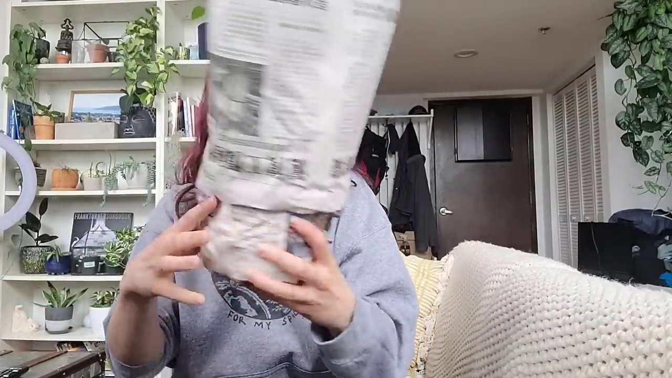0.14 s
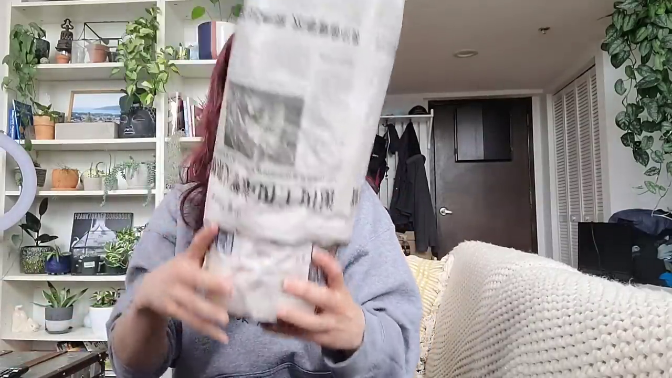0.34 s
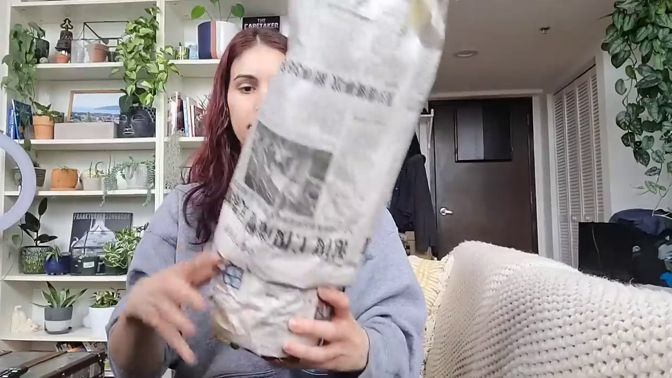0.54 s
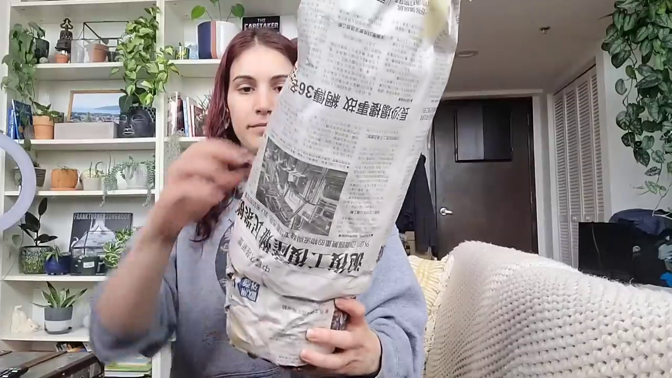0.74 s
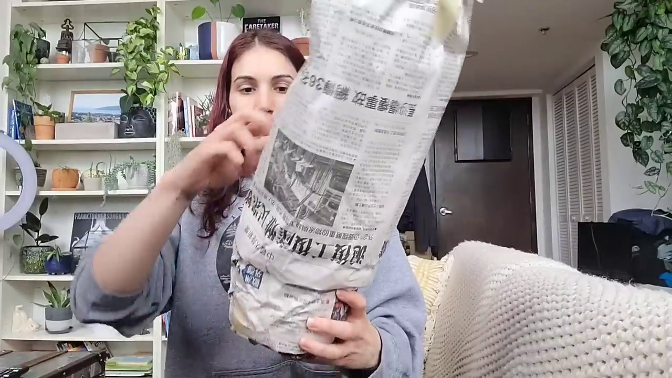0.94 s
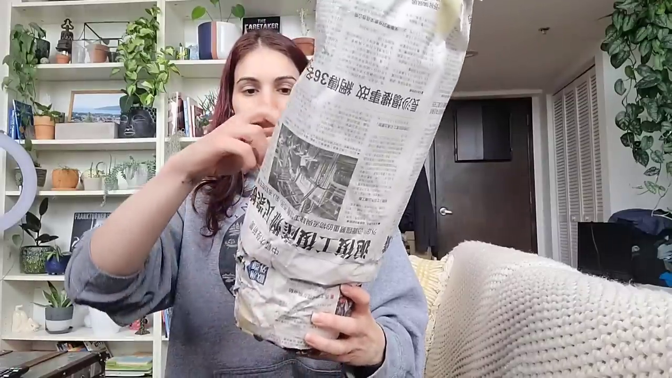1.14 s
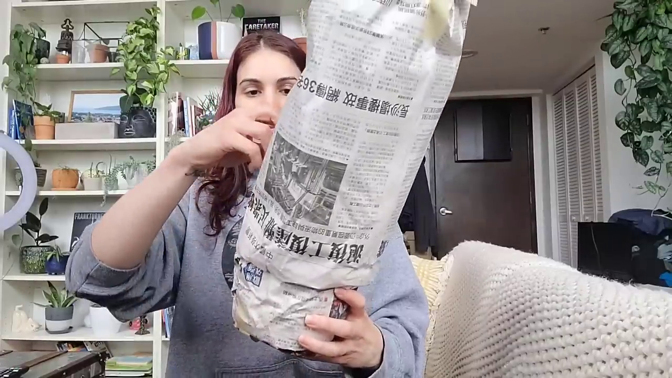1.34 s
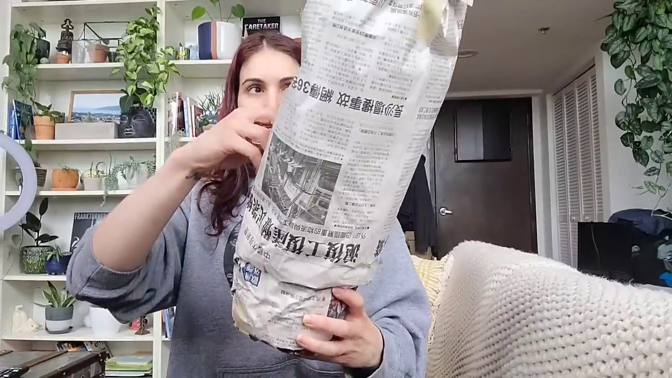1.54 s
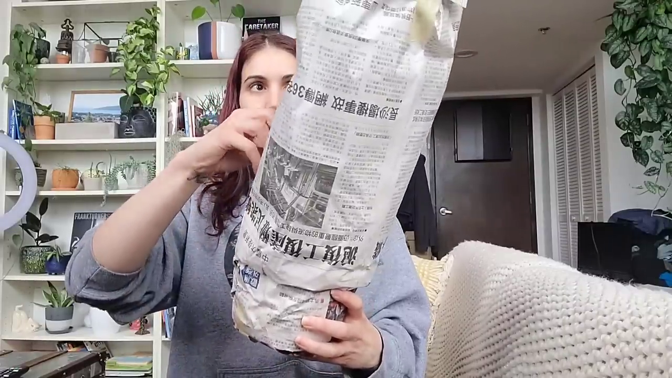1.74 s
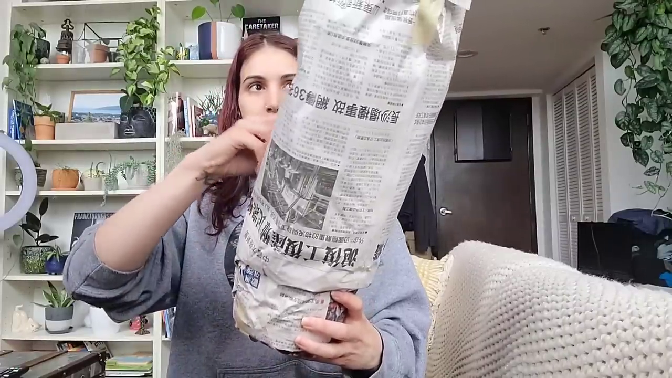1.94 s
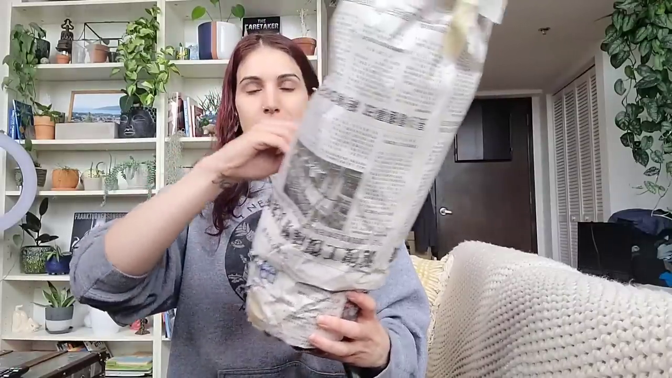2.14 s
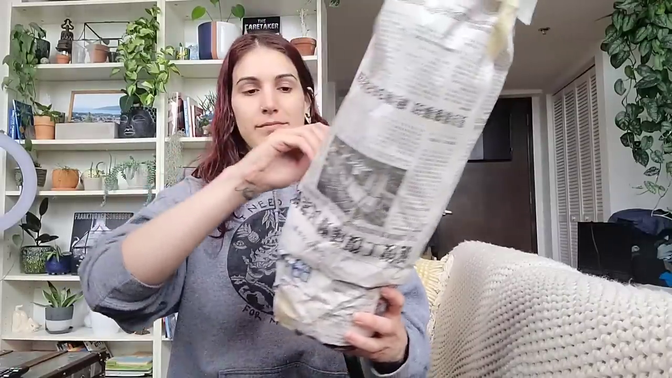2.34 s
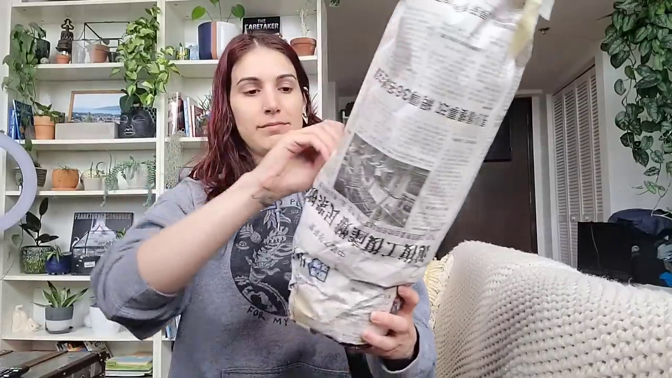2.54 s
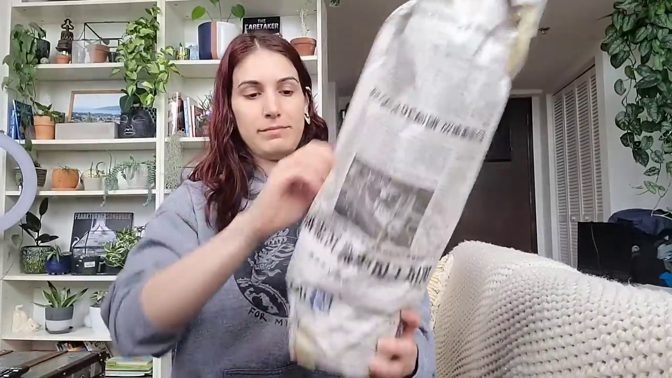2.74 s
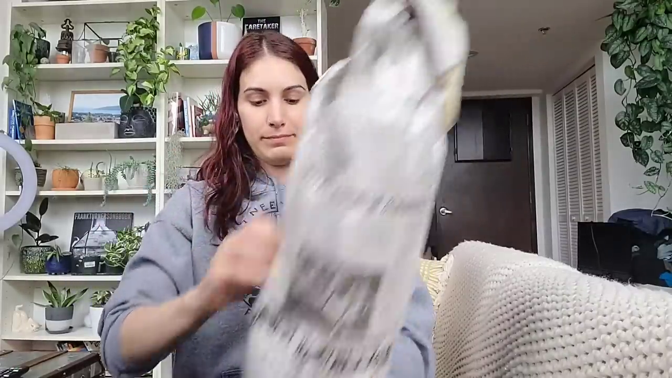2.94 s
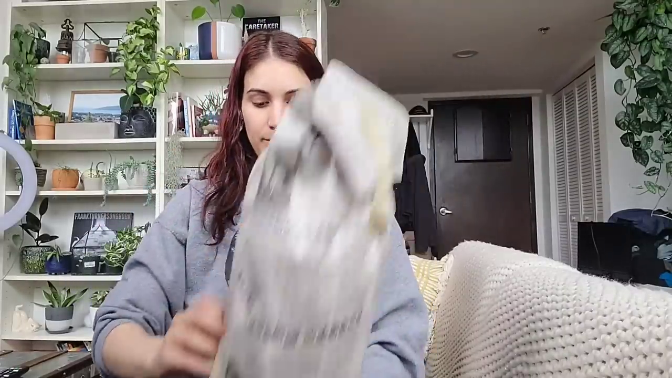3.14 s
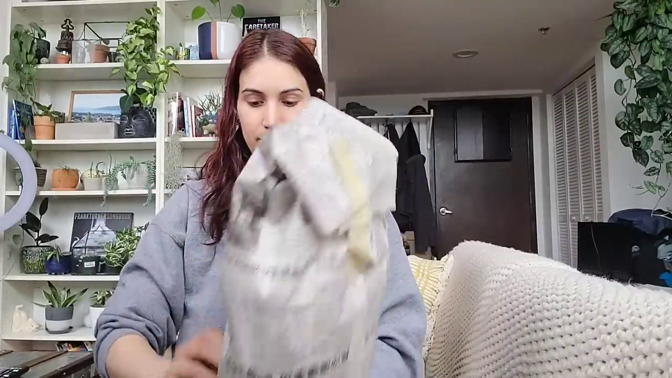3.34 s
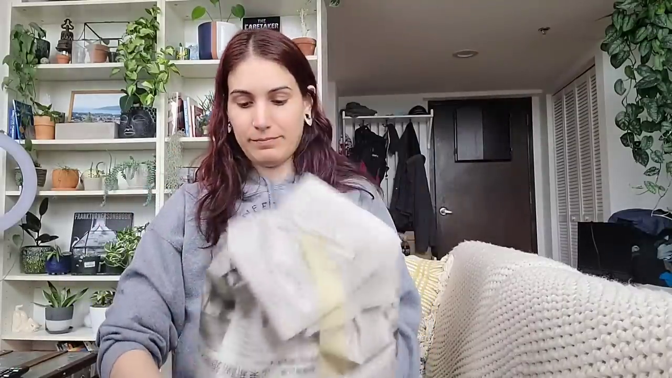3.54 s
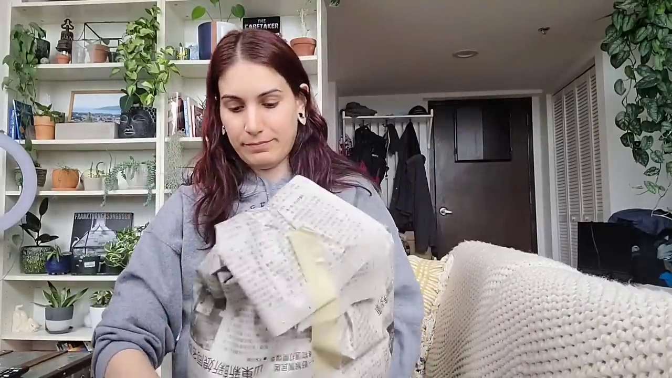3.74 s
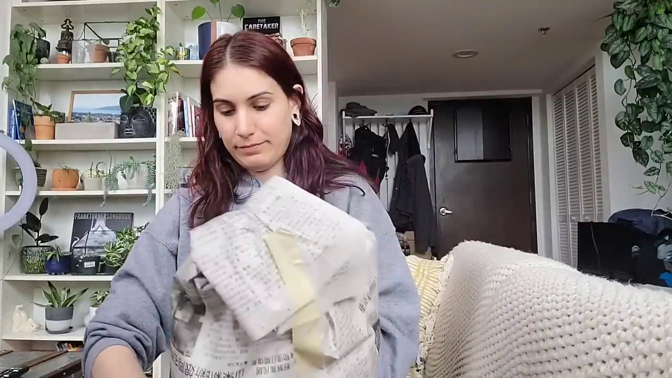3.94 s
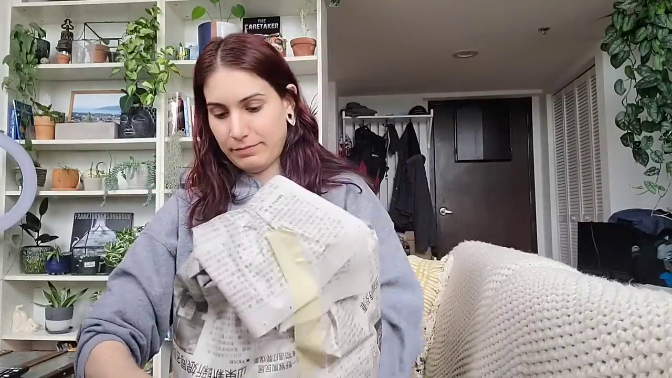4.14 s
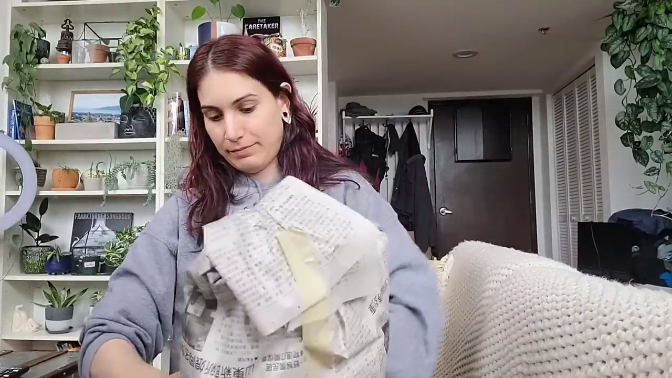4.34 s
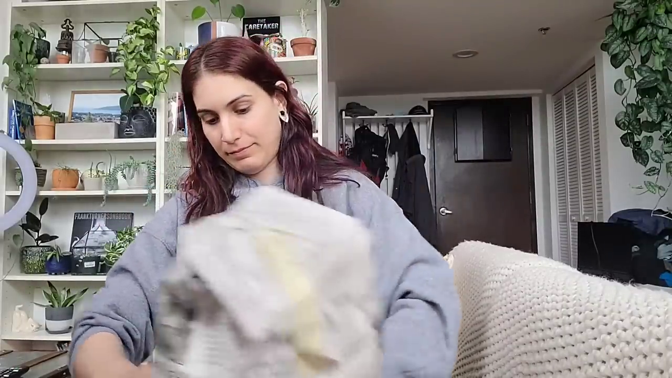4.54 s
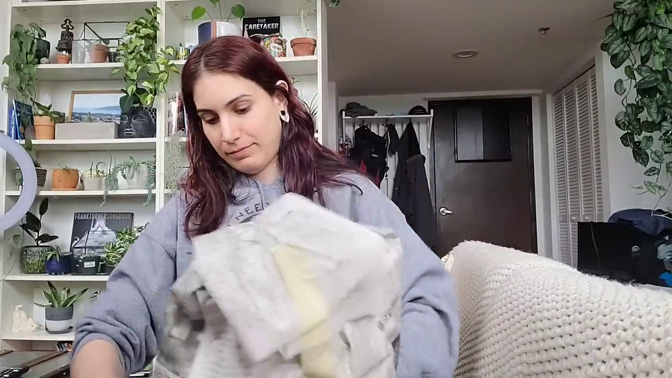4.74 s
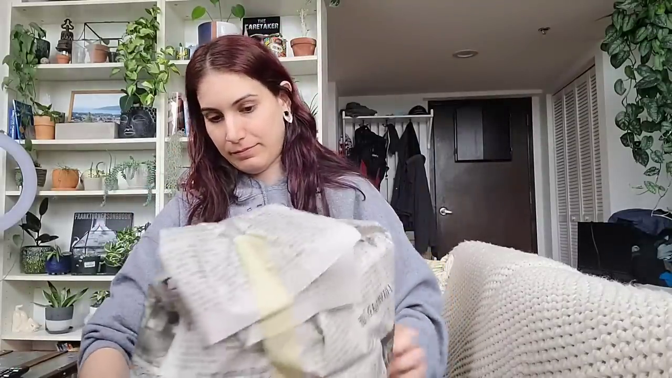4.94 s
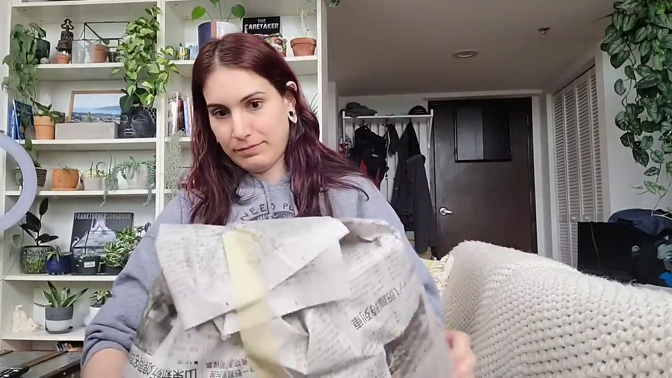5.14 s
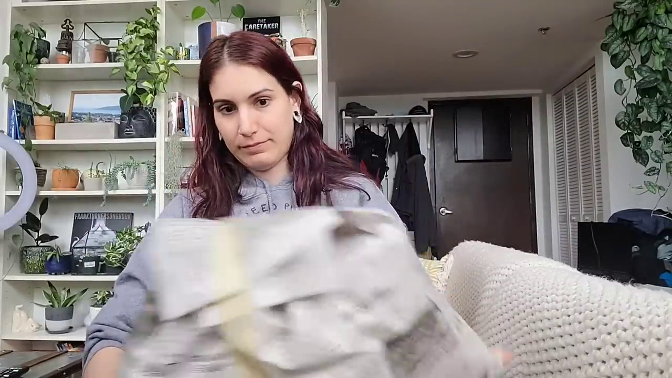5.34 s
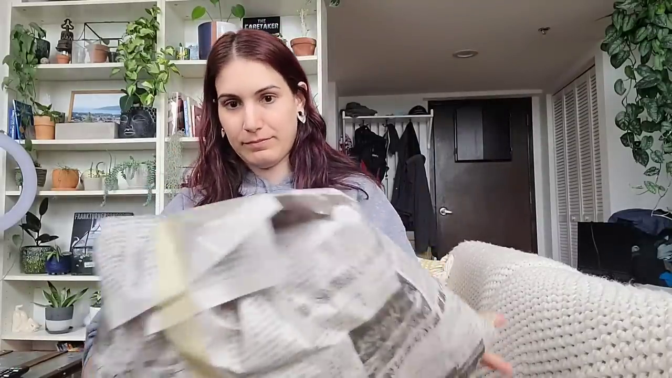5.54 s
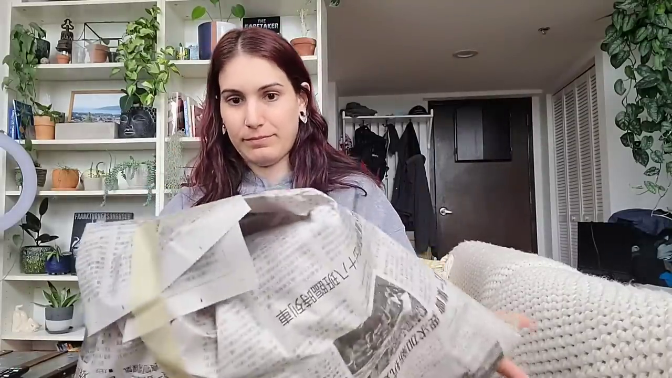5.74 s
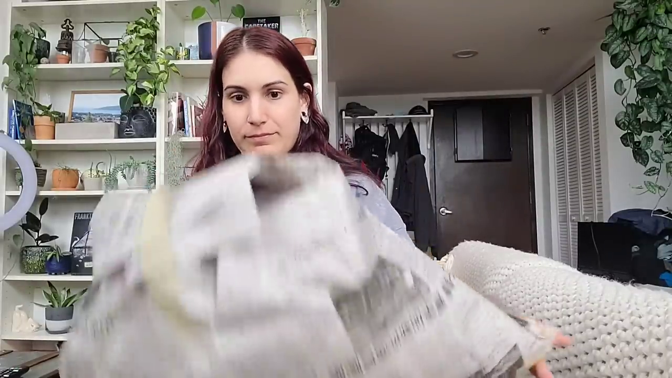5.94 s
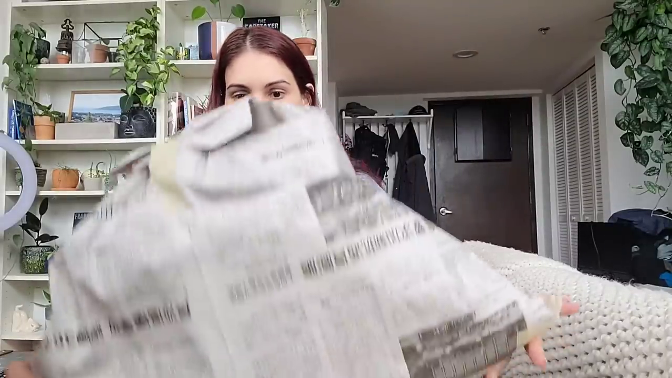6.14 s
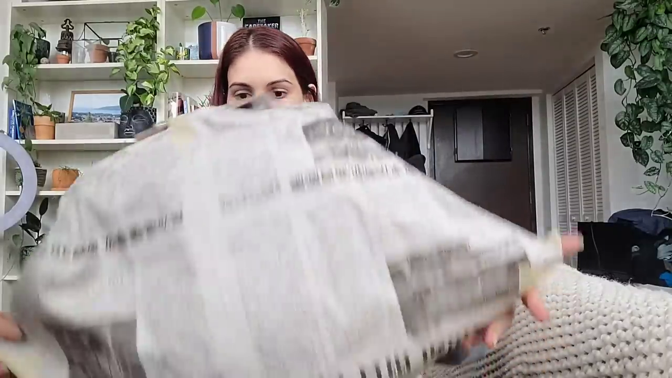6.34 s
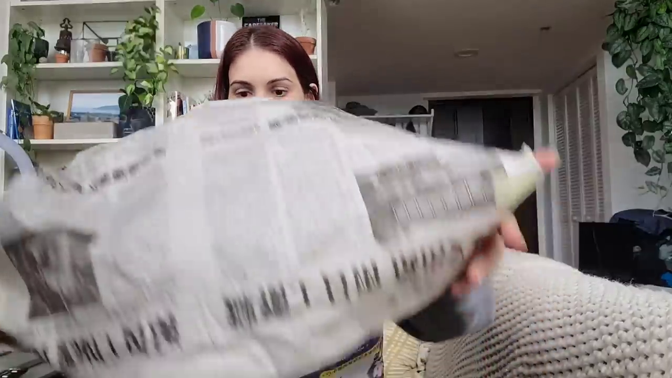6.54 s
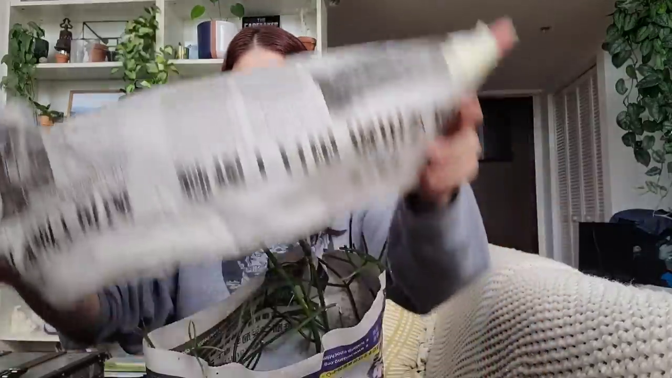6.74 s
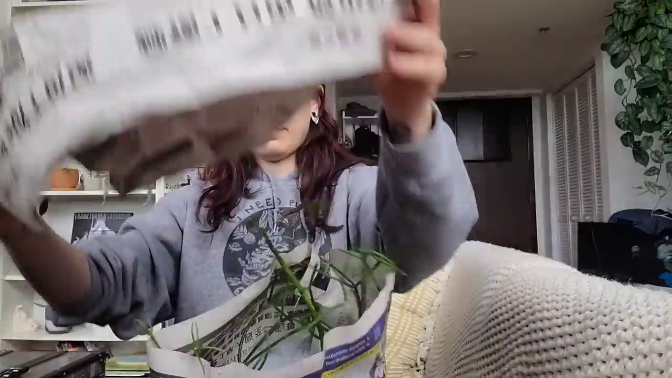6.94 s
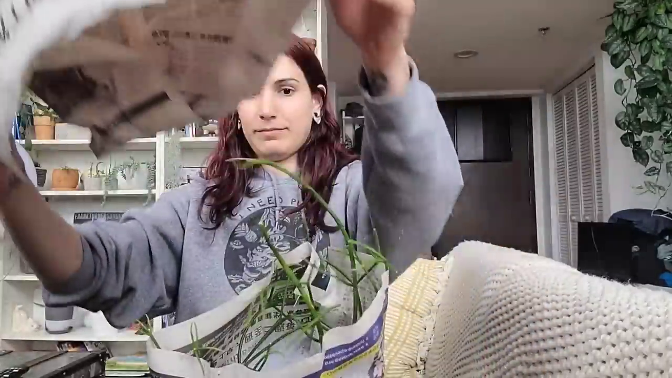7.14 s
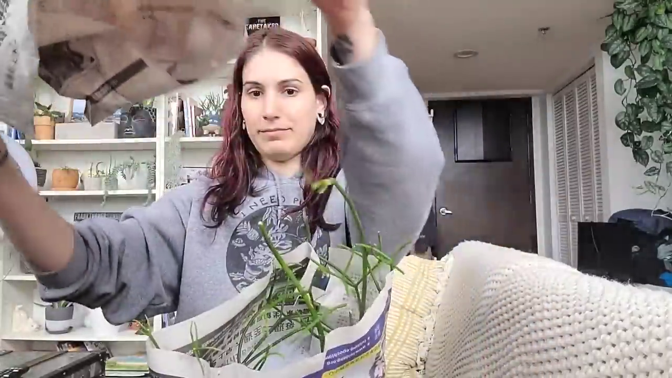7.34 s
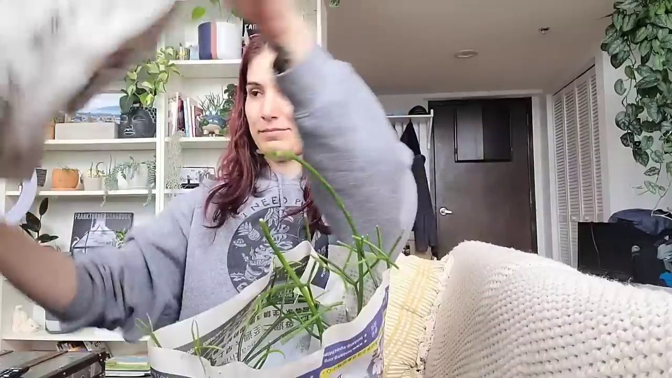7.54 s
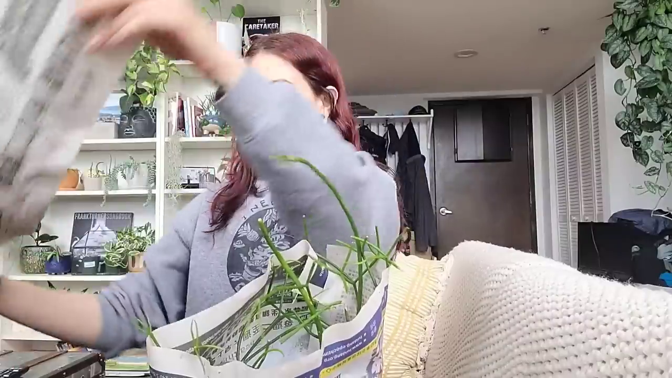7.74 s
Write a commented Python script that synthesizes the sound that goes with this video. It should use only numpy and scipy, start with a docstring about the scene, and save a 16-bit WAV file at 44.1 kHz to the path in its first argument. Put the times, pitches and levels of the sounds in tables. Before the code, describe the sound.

Dry paper crackles in someone's hands near the microphone, with soft parcel thuds, a quiet middle, a busier second half and faint appliance hum.

```python
"""Over the room tone of a furnished living room, where an appliance hums, hands turn and lift a newspaper
wrapping close to a pair of microphones. First comes a quick run of sharp snaps, then a sparser stretch;
from about 4.4 s the paper is busy again, and near 6.5 s the knock of the creases rises as it is lifted open.
Snaps are ringing noise bursts, the rustle is patchy noise with tiny tones and ticks, and the parcel's
soft thuds are low noise. A short echo follows the paper."""
import sys
import numpy as np
from scipy import signal
from scipy.fft import rfft, irfft, next_fast_len
from scipy.io import wavfile
from scipy.ndimage import uniform_filter1d, map_coordinates

SR = 44100
rng = np.random.default_rng(int(sys.argv[2]) if len(sys.argv) > 2 else 0)


def log_audio(samples):
    """Write samples as a 16-bit WAV file to the path given in sys.argv[1]."""
    # one column per channel
    frames = np.atleast_2d(samples).T
    # limit to full scale, then quantise
    limited = np.clip(frames, -1, 1)
    pcm = np.round(limited * 32767).astype(np.int16)
    wavfile.write(sys.argv[1], SR, pcm)


N = 343539  # length in samples

# handfuls of paper crumpled: peak_s, rustle_db, length_ms, fine_hiss_db (re rustle_db)
CRUMPLES = [(.135, -43.5, 110, -10), (0.263, -38.5, 140, -7), (0.508, -48.5, 52, 2),
            (1.342, -44.5, 91, -9.5), (1.427, -48, 60, 2), (1.791, -48, 104, -5), (1.9, -38, 40, -16),
            (2.175, -53, 30, -18), (2.266, -46, 53, -19), (2.307, -45, 27, 0), (2.437, -42.5, 98, -7.5),
            (2.92, -55.5, 34, -3.5), (3.12, -50.5, 25, -7), (3.353, -46.5, 51, -13),
            (3.642, -44.5, 216, -13), (3.954, -55, 71, -6), (4.261, -50, 69, -4), (4.528, -30, 31, -7),
            (4.555, -27, 40, -12), (4.587, -30.5, 42, -10), (4.64, -40.5, 210, -11.5),
            (4.809, -43, 24, -24), (5.149, -38, 120, -13), (5.261, -33.5, 37, -9), (5.39, -31, 39, -8),
            (5.446, -38, 160, -11), (5.654, -40, 105, -23), (5.77, -44, 120, -16), (6.091, -38.5, 103, -14),
            (6.231, -41, 390, -3), (6.569, -31, 27, -8.5), (7.01, -52, 50, -6), (7.504, -45.5, 83, -5),
            (5.08, -46.5, 250, -2.5)]


def amp(db):
    """Turns decibels into a gain."""
    return 10 ** (np.asarray(db) / 20)


def unit(x):
    """Scales a sound to an rms of 1."""
    return x / np.sqrt(np.mean(x ** 2) + 1e-20)


def along(points, hz):
    """Reads a curve of (Hz, value) points, with straight lines on a log frequency axis."""
    point_hz, value = np.transpose(points)
    return np.interp(np.log(hz + 1), np.log(point_hz + 1), value)


def curves(rows):
    """Gives one value per sample for each column after the time in seconds."""
    s, *columns = np.transpose(rows)
    return [np.interp(np.arange(N) / SR, s, column) for column in columns]


def wobble(rate):
    """Draws a smooth random curve with `rate` knots a second."""
    knots = rng.standard_normal(int(N * rate / SR) + 4)
    return map_coordinates(knots, [np.arange(N) * rate / SR])


def filtered(x, response):
    """Multiplies the spectrum of x by a response of frequency, along the last axis."""
    size = next_fast_len(x.shape[-1] + 512)
    spectrum = rfft(x, size) * response(np.fft.rfftfreq(size, 1 / SR))
    return irfft(spectrum, size)[..., :x.shape[-1]]


def place(s, rows, lead=0):
    """Adds up short sounds (channels, events, samples) at their times; `lead` samples come before each time."""
    length = rows.shape[-1]
    at = (np.round(s * SR).astype(int)[:, None] + np.arange(length)).ravel()
    return np.array([np.bincount(at, r.ravel(), N + 2 * length)[lead:lead + N] for r in rows])


def spread(pair):
    """Mixes two unrelated signals into left and right with a set likeness and phase at each pitch."""
    # how alike the two ports are: pitch_hz, likeness (1 = the same)
    alike = [(60, .92), (290, .82), (600, .98), (1000, .95), (1410, .76), (3100, .86), (6500, .62),
             (8500, .6)]
    # how far the left port leads the right: pitch_hz, lead_radians
    leads = [(1300, 0.17), (2800, 1.1), (4200, 1.44), (7000, 0)]
    sign = np.reshape([1, -1], (2,) + (1,) * (pair.ndim - 1))  # left, right

    def turn(hz):
        return np.arccos(np.clip(along(alike, hz), -1, 1)) / 2

    def phase(hz):
        return np.exp(.5j * sign * along(leads, hz))

    shared = filtered(pair[0], lambda hz: np.cos(turn(hz)) * phase(hz))
    opposed = filtered(pair[1], lambda hz: sign * np.sin(turn(hz)) * phase(hz))
    return shared + opposed


def room_tone():
    """Steady air of the room, a wavering hum, and a steady mains tone that is opposite in the two ports."""
    # colour of the air before it is set to its level: pitch_hz, level_db (per Hz)
    air_colour = [(15, -29), (25, 5), (82, -2.5), (240, 2), (314, -12), (807, -23), (1420, -33),
                  (1760, -17.5), (4170, -83), (15600, -76)]
    # wavering hum, a narrow band of noise: pitch_hz, width_hz, level_db
    hum = [(119.7, 7.4, -53.5)]
    noise = spread(rng.standard_normal((2, N)))
    air = unit(filtered(noise, lambda hz: amp(along(air_colour, hz))))
    out = amp(-51.5 + 2.16 * wobble(1.47)) * air
    for pitch_hz, width_hz, level_db in hum:
        band = filtered(rng.standard_normal(N), lambda hz: np.exp(-((hz - pitch_hz) / width_hz) ** 2))
        out = out + amp(level_db) * unit(band)
    mains = np.sin(2 * np.pi * 120 * np.arange(N) / SR)
    return out + amp(-67.0) * np.outer([-1, 1], mains)


def thuds():
    """The weight of the parcel pushes low noise when it is shifted; the palms rub dully on it."""
    # the parcel shifts in the hands: start_s, push_db (low push of its weight), rub_db (dull rub of the palms)
    shifting = [(0.0, -47, -69), (0.22, -51, -51), (0.255, -45, -36), (0.33, -41.5, -48.5),
                (0.56, -55.5, -61), (1.99, -49, -55.5), (4.49, -50, -58), (4.515, -37, -37.5),
                (4.565, -43, -38), (4.6, -35.5, -48), (4.67, -46, -47.5), (5.29, -46.5, -57),
                (5.36, -50, -44), (5.405, -36.5, -44.5), (5.57, -40, -49.5), (5.7, -43.5, -49.5),
                (6.09, -40.5, -51.5), (6.5, -47.5, -52.5), (6.94, -46.5, -51.5), (7.03, -41.5, -48),
                (7.12, -50, -60.5), (7.64, -45.5, -52.5), (7.79, -46, -46)]
    # colour of the push, then of the rub, before their levels: pitch_hz, level_db (per Hz)
    push_colour = [(20, -40), (45, -4.5), (65, 5), (95, -2), (140, -6), (300, -46)]
    rub_colour = [(80, -12), (200, 1.5), (430, -3), (750, -12), (1100, -29)]
    push_db, rub_db = curves(shifting)

    def noise(points):
        return unit(filtered(spread(rng.standard_normal((2, N))), lambda hz: amp(along(points, hz))))

    push = amp(push_db + 0.76 * wobble(5.1)) * noise(push_colour)
    rub = amp(rub_db + 1.8 * wobble(30)) * noise(rub_colour)
    return push + rub


def registers(x):
    """Gives x the colour of paper and splits it into body, crinkle and hiss."""
    # colour of the sheets at the microphones, before levels are set: pitch_hz, level_db (per Hz)
    paper_colour = [(180, -19), (300, 11), (663, 2.5), (809, -2.5), (1180, 3), (1400, -8.5), (2250, -7.5),
                    (2700, -8), (4230, -10), (7410, -19), (9040, -19), (15600, -21)]
    # resonances of the parcel, and a broad lift near 4 kHz: pitch_hz, width_hz, boost_db
    sheet = [(800.4, 74, 8.5), (1325, 660, -6.5), (4250, 1230, 3.5)]
    # edges of the three parts, in Hz: the body starts, turns to crinkle, then to hiss
    hollow_hz, body_hz, hiss_hz = 400, 1590, 6970

    def colour(hz):
        rings = sum(db / (1 + 1j * (hz - c) / (w / 2)) for c, w, db in sheet)
        low = 1 / (1 + (hz / body_hz) ** 8)
        high = 1 - 1 / (1 + (hz / hiss_hz) ** 8)
        body = low - 1 / (1 + (hz / hollow_hz) ** 4)
        parts = np.sqrt(np.clip([body, 1 - low - high, high], 0, 1))
        gains = amp(along(paper_colour, hz) + rings) * parts
        return gains.reshape((3,) + (1,) * (x.ndim - 1) + (-1,))

    return filtered(x, colour)


def patchy(x, depth_db):
    """Random patches of colour: each part of a sheet rings at its own pitches for a moment."""
    hz, _, z = signal.stft(x, SR, nperseg=768)
    depth_db = depth_db / (1 + (hz[:, None] / 10000) ** 2)  # the patches grow shallower towards the treble
    field = rng.standard_normal(z.shape[1:])
    field = uniform_filter1d(field, size=3, axis=0)
    field = uniform_filter1d(field, size=4, axis=1)
    return signal.istft(z * amp(depth_db * unit(field)), nperseg=768)[1][:, :N]


def buckles(per_s, spread_db, cycles, lag_s):
    """Tiny buckles: damped tones of random pitch, a few much larger than the rest, each with its own lag."""
    draw = rng.random((round(8 * per_s), 5))  # spread over 8 s
    draw = draw[draw[:, 0] < N / SR / 8]
    s = 8 * draw[:, 0]
    hz = 800 * amp(22.94 * draw[:, 1:2])
    size_db = np.minimum(-spread_db * np.log(draw[:, 2:3] + 1e-9), 4 * spread_db)
    strength = amp(size_db) * np.sqrt(hz)
    lag = lag_s * (draw[:, 3:4] - .5) * (hz < 7000)  # no lag between the ports from 7 kHz up
    t = np.maximum(np.arange(200) / SR - lag_s + np.array([lag, -lag]), 0)
    life = cycles * (0.31 + draw[:, 4:5]) / hz
    swell = t / life * np.exp(-t / life)
    return unit(place(s, strength * np.sin(2 * np.pi * hz * t) * swell))


def ticks(per_s, spread_db, fall_ms):
    """Small dry folds: short noise bursts, each with its own broad colour, length and size."""
    draw = rng.random((round(8 * per_s), 4))  # spread over 8 s
    noise = rng.standard_normal((2, len(draw), 300))
    centre_hz = 1000 * amp(18.9 * draw[:, 1:2])
    strength = amp(np.minimum(-spread_db * np.log(draw[:, 2:3] + 1e-9), 3 * spread_db))
    ms = np.arange(300) / SR * 1000
    life = ms / (fall_ms * (0.3 + draw[:, 3:4]))  # age of the burst in fall times
    burst = noise * strength * life * np.exp(-life)

    def colour(hz):
        return 1 / (1 + 1j * (hz / centre_hz - centre_hz / (hz + 1))) ** 2

    keep = draw[:, 0] < N / SR / 8
    return unit(place(8 * draw[keep, 0], filtered(spread(burst), colour)[:, keep]))


def effort(busy_db, peak_db):
    """A slow level with every crumple swelling out of it and dying back, in dB."""
    rise_over_fall = 0.8
    s, _, length_ms, _ = np.transpose(CRUMPLES)[..., None]
    ms = (np.arange(N) / SR - s) * 1000
    side_ms = np.where(ms < 0, rise_over_fall, 1) * length_ms
    swell = np.exp(-4 * np.abs(ms) / np.clip(side_ms, 3, 400))
    return 10 * np.log10(amp(2 * busy_db) + amp(2 * peak_db) @ swell)  # powers add


def rustle():
    """Sheets slide (patchy noise) and buckle (grains) as the hands work; the effort comes in clumps."""
    # how busy the hands are under the crumples: start_s, rustle_db, fine_hiss_db (re rustle_db),
    # hollow_db (extra level of the hollow body)
    busy = [(0, -45.5, -16, -1), (.08, -62.5, 5, -2.5), (.4, -46, -18, -2), (.65, -57.5, -5.5, -2.5),
            (.96, -71.5, -25, 6), (1.2, -60, -17, 1.5), (1.67, -65, -18, 6.5), (2.3, -55.5, 1.5, 5.5),
            (2.64, -60.5, -35, 2.5), (3.5, -59, 0, 3), (4.12, -63, -13, 4.5), (4.46, -57.5, -16, 3),
            (4.7, -48.5, -17, 0), (5.6, -47, -8, 1), (5.9, -55, -3, 4.5), (6.4, -43.5, -6, -3),
            (6.7, -52, -12, 4), (6.98, -45, -5.5, -2), (7.2, -65, -10, 3), (7.79, -45, -17, -2)]
    body_even_db = -53  # rustle level where the hollow body is as loud, before hollow_db
    body_follows = 0.69  # share of the rustle's swings that the body follows
    busy_db, fine_db, hollow_db = curves(busy)
    _, peak_db, _, bright_db = np.transpose(CRUMPLES)
    level_db = effort(busy_db, peak_db)
    hiss_db = effort(busy_db + fine_db, peak_db + bright_db) - level_db
    body_db = (body_follows - 1) * (level_db - body_even_db) + hollow_db

    slide = unit(patchy(spread(rng.standard_normal((2, N))), depth_db=4.6))
    grain = buckles(per_s=1500, spread_db=2.0, cycles=0.67, lag_s=0.00027)
    folds = ticks(per_s=220, spread_db=3.5, fall_ms=1.0)
    crackle = slide + .55 * grain + .9 * folds
    flicker = amp(1.47 * wobble(35))
    body, crinkle, hiss = map(unit, registers(flicker * crackle))

    # each part also wavers on its own
    body = amp(body_db) * amp(0.39 * wobble(26)) * body
    crinkle = amp(0.39 * wobble(26)) * crinkle
    hiss = amp(hiss_db + 0.95 * wobble(18)) * hiss
    return amp(level_db) * (body + crinkle + hiss)


def shaded(x):
    """The upper crinkle is shaded more or less with how low the parcel is held, down towards the lap."""
    # shading of the upper crinkle: start_s, level_db (at the centre of the band)
    shade = [(3.2, -7), (3.5, -3.5), (5.9, -6), (6.2, -2.5)]
    centre_hz, width_hz = 5360, 1400
    upper = filtered(x, lambda hz: np.exp(-((hz - centre_hz) / width_hz) ** 2))
    return x + (amp(curves(shade)[0]) - 1) * upper


def snaps():
    """Each crease gives way in a short spiky burst that rings at the pitch of its fold."""
    # creases that snap: start_s (the peak), level_db (crinkle), ring_hz, body_db and hiss_db (re level_db),
    # fall_ms (held to 15 at most)
    creases = [(0.109,-25.5,4570,-37,-10,5.7), (0.1121,-22.5,4470,-29,-11,2.5),
               (.1165,-24.5,4000,-30,-14,2), (0.1242,-30,3400,-27,-24,1.7), (0.144,-30.5,4570,-27,-22,1.6),
               (0.17,-38,4110,-16,-19,5), (0.187,-27.5,4130,-34,-13,2.3), (0.2246,-34.5,4110,-21,-8,2.1),
               (0.231,-38,3600,-10,-13,2.2), (.268,-36,3700,-6,-14,3), (0.3481,-30.5,4100,-30,-3.5,2),
               (.3623,-38.5,3630,4,-2,2.9), (0.523,-43.5,4000,-40,-14,8.8), (0.796,-56,4360,-6,1,1.9),
               (0.9011,-37,2670,-26,-12,1.5), (0.9998,-51.5,1820,5,-24,5.1), (1.0079,-49.5,4200,11,-8,6.9),
               (1.163,-52,4800,12.5,7,3.2), (1.292,-49,4700,-8,-12,4), (1.3424,-35.5,1930,-6,-7,2),
               (1.389,-39,4700,-12,-14,2), (1.397,-41,4500,-10,-14,2.8), (1.4085,-28.5,4630,-25,-5,2),
               (1.449,-42,4150,-11,-13,7.3), (1.7309,-48.5,3320,7,-14,5), (1.7453,-43.5,4640,5,-7,2.7),
               (1.7727,-39.5,4400,8.5,0,4.1), (1.795,-19,4830,-7.5,-16,2.2), (1.844,-52.5,3550,18.5,-5,3.9),
               (1.8987,-36.5,4300,-17,-26,11), (1.9906,-34.5,4360,-7.5,3,2.3), (2.1225,-51,1760,7,-15,3.9),
               (2.1475,-49,1790,1,-19,4), (2.167,-46,4100,0,-14,9.3), (2.181,-44,3500,-6,-11,4.9),
               (2.1927,-44.5,1950,7.5,-16,5.2), (2.236,-49,4300,5,-8,8.1), (2.256,-43,4200,6,-8,6.6),
               (2.283,-38.5,4200,4,-17,2.5), (2.301,-47,4200,2,-6,3.8), (2.371,-43.5,4200,6.5,-10,8.1),
               (2.3841,-47.5,4140,10,-6,11), (2.405,-47.5,4500,.5,-2,6.5), (2.435,-40.5,3500,6,-17,5.7),
               (2.654,-58,2580,23,-21,3.3), (2.7654,-41,4170,1,-12,5.8), (2.827,-41,1790,1,1.5,3.3),
               (2.8555,-30.5,4370,-26,-24,1.8), (3.0155,-43.5,4000,4.5,-11,3.9),
               (3.1852,-35.5,2800,0.5,-2.5,3.6), (3.375,-44,3470,1,-6,2.3), (3.4796,-38.5,2430,-10,-33,4.2),
               (3.4881,-37,2520,-6,-28,1.8), (3.524,-50.5,4520,8.5,-24,26), (3.5974,-29.5,2420,-12,-9,3.9),
               (3.7149,-38.5,2600,-4,-37,3.9), (3.776,-46,2420,2,-11,36), (3.9442,-44,2540,-1.5,-40,12.4),
               (4.411,-41.5,3250,-23,-11,2.8), (4.48,-47,3200,-19,3,5.6), (4.518,-32,2200,-15,-19,3),
               (4.57,-30.5,2530,-2,-25,12), (4.5927,-31,3500,0,-18,6.2), (4.643,-43,2480,1,-25,5.3),
               (4.73,-42,2430,-1,-35,18), (4.79,-38.5,2760,-2,-13,9.1), (4.804,-35,2030,-9,-30,4.8),
               (4.813,-33,2490,-2,-29,6.1), (4.8844,-31,2610,-10,-47,3.7), (4.9043,-34.5,2470,-17,-34,3.7),
               (4.9601,-35,2190,-3,-8,6.1), (5.034,-29.5,2600,-2,-20,9.5), (5.155,-44.5,1680,10,-20,5),
               (5.292,-27.5,2650,-32,-8,2.1), (5.3412,-34.5,2450,-24,-6,12), (5.348,-40,5960,1,4,9.9),
               (5.388,-31,2480,-5,-7,4), (5.3985,-26,2400,-5,-4.5,5.3), (5.4485,-40,3040,-10,-18,5),
               (5.475,-38,3900,-12,-20,4.4), (5.5097,-37.5,1940,-2,-28,5.2), (5.5655,-35,1910,-5,-34,6.5),
               (5.592,-43,3500,-3,-20,4.5), (5.655,-36.5,2530,-5,-9,8.3), (5.688,-39.5,3550,-11,-9,6.1),
               (5.702,-39,3300,1,-20,4.5), (5.7792,-29,3250,5,-6.5,5.7), (5.938,-40,3030,-24,-36,8.9),
               (6.083,-41.5,2500,6.5,-14,4), (6.12,-29,3530,-8.5,-17,3.3), (6.219,-44.5,1900,9.5,-15,6.7),
               (6.234,-39,3670,3.5,9.5,5.4), (6.4169,-31,2500,-5.5,-4.5,4.8), (6.469,-40.5,4520,-5,-8,16),
               (6.562,-32,2530,-12,-10,1.8), (6.5707,-33,3460,4.5,3,2), (6.6348,-51,3020,21.5,-5,1.6),
               (6.66,-45,4500,1,-12,5), (6.6842,-41.5,5030,12.5,-3.5,3.7), (6.7287,-36,4560,3.5,-10,4.7),
               (6.768,-39.5,3000,2,-5.5,5.5), (6.7881,-34.5,2510,3.5,-15,6.8), (6.8566,-33,4240,-7,-25,5.6),
               (6.869,-24.5,4310,-15,-10.5,2.4), (6.8943,-31,3930,-2,-20,4.2),
               (6.9033,-27,5140,2.5,2.5,3.3), (6.9503,-43,4000,9,-1,17), (6.991,-47.5,1790,16,-2,21),
               (7.015,-28,3480,0,-0.5,6.3), (7.268,-50.5,1900,3,-12,7.7), (7.535,-37,5260,1.5,-10,12),
               (7.551,-35,2980,2,-22,3), (7.562,-36.5,5250,0,-5,4.7), (7.5858,-37,3470,-11,-19,1.9),
               (7.608,-34,3700,1,-17,8.1), (7.642,-33.5,5200,2.5,-33,6.8), (7.674,-52,1880,13.5,-21,6.5),
               (7.7039,-35.5,1930,13.5,-3,0.87), (7.717,-45,5320,11,4.5,6.7), (7.7632,-37,5370,3,-5,3.1),
               (7.771,-36,2000,3,-5,2.3), (7.775,-22.5,7850,2.5,2.5,2.7)]
    # knock of a crease rises as the wrapping is lifted open: start_s, pitch_hz
    opening = [(6.45, 890), (6.7, 1200)]
    rise_over_fall = 0.47
    lead = 640  # samples before the peak
    s, db, ring_hz, body_db, hiss_db, fall_ms = np.transpose(creases)[..., None]
    ms = (np.arange(1800) - lead) / SR * 1000
    draw = rng.standard_normal((len(s), 4, len(ms)))
    noise = np.moveaxis(draw[:, :2], 1, 0)
    side_ms = np.where(ms < 0, rise_over_fall, 1) * fall_ms
    shape = np.exp(-np.abs(ms) / np.clip(side_ms, .2, 15))
    crack = 1 + .6 * np.exp(-(ms / .3) ** 2)  # the main break
    spikes = amp(np.minimum(10.8 * uniform_filter1d(draw[:, 2], size=9), 6))  # fibres let go unevenly
    side = draw[:, 3, 0:1]  # where on the parcel the crease lies

    def fold(hz):
        ring_db = 11.3 / (1 + 1j * (hz - ring_hz) / (0.11 * ring_hz))
        knock_hz = np.interp(s, *np.transpose(opening))
        knock_db = 5 / (1 + 1j * (hz - knock_hz) / 160)
        # random ups and downs of colour, one about every 300 Hz
        spots = np.broadcast_arrays(np.arange(len(s))[:, None], 1 + hz / 300)
        facets = map_coordinates(draw[:, 3], spots, order=1)
        # the two ports hear it at different moments
        turn = np.pi * hz * .00004 * side / (1 + (hz / 6500) ** 8)
        thin = 1 - 1 / (1 + (hz / 750) ** 4)  # a single fold is too small for low tones
        dull = 1 / (1 + (hz / 11000) ** 3)  # and too soft for the highest
        return thin * dull * amp(ring_db + knock_db + 2.2 * facets) * np.exp(1j * np.array([turn, -turn]))

    parts = registers(filtered(spread(noise * shape * crack * spikes), fold))
    # every part of every burst is brought to its own level
    energy = (parts.mean(axis=1) ** 2).sum(axis=-1) / (shape ** 2).sum(axis=-1)
    levels = np.array([db + body_db, db, db + hiss_db])[:, None]
    bursts = (amp(levels) * parts / np.sqrt(energy)[:, None, :, None]).sum(axis=0)
    panned = bursts * amp(.8 * np.array([side, -side]))
    return place(s[:, 0], panned, lead=lead)


def reverb(x):
    """The room answers with a noise tail in which each frequency dies at its own speed."""
    # how long the room rings: pitch_hz, t60_s (time to fall by 60 dB)
    ring_time = [(200, 0.095), (2000, 0.24), (10000, 0.095)]
    hz, t, z = signal.stft(rng.standard_normal((2, SR // 2)), SR, nperseg=256)
    fall = amp(-60 * t / along(ring_time, hz)[:, None])
    tail = signal.istft(z * fall, SR, nperseg=256)[1]
    late = np.pad(x, ((0, 0), (130, 0)))  # the echo starts 130 samples later
    return signal.fftconvolve(late, tail / np.linalg.norm(tail[0]), axes=1)[:, :N]


def scene():
    """Paper near the microphones, its echo, the thuds and the room tone."""
    paper = snaps() + shaded(rustle())
    return paper + amp(-11.5) * reverb(paper) + thuds() + room_tone()


def record(dry):
    """The housing ripples the colour and the two ports differ a little; nothing is kept above the band limit."""
    # ripple of the microphone housing: pitch_hz, width_hz, boost_db
    housing = [(1850, 130, 2.5), (2503, 50, 4.5), (2994, 83, 4), (3540, 83, 3.5), (4040, 99, 0),
               (4900, 160, 0.5), (5330, 870, -2), (5750, 170, 2.5), (7190, 1170, -3.5), (8850, 710, 1)]
    # level of left over right: pitch_hz, difference_db
    lean = [(60, -0.3), (700, -2.5), (2400, -0.5), (4400, 2.5), (15000, 0.5)]
    top_hz = 16000

    def response(hz):
        ripple_db = sum(db / (1 + 1j * (hz - c) / (w / 2)) for c, w, db in housing)
        lean_db = np.outer([.5, -.5], along(lean, hz))
        return amp(ripple_db + lean_db) * (hz < top_hz)

    return filtered(dry, response)


dry = scene()
out = record(dry)
log_audio(out)
```